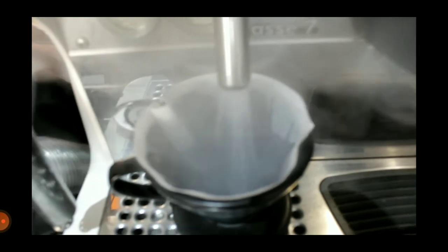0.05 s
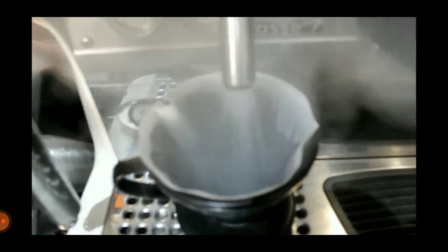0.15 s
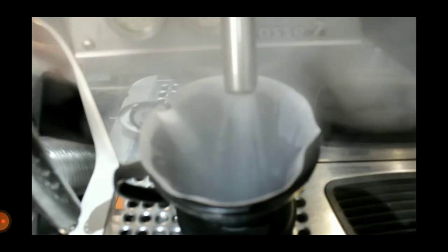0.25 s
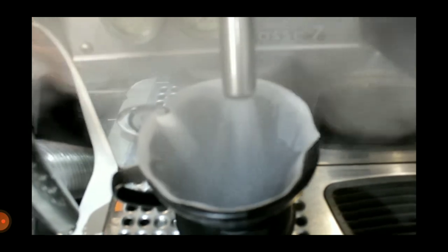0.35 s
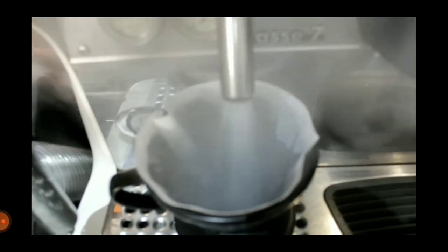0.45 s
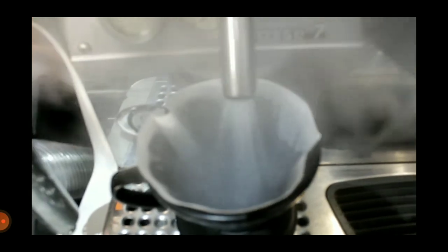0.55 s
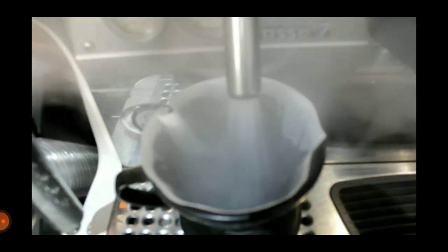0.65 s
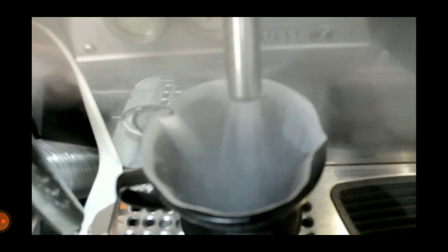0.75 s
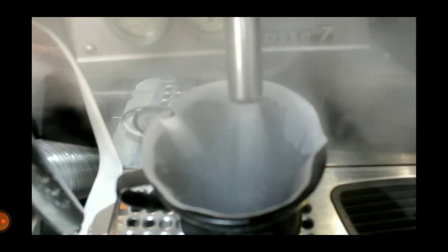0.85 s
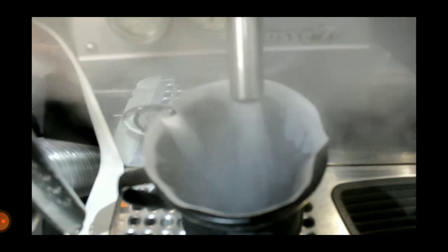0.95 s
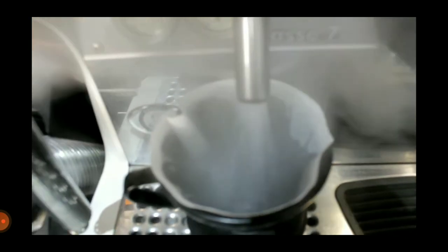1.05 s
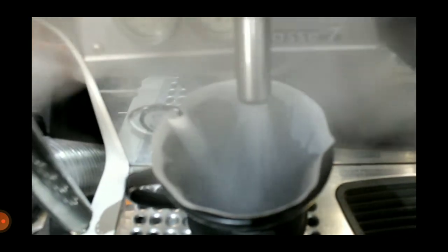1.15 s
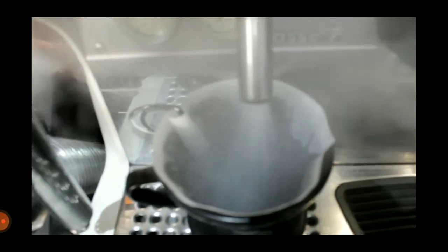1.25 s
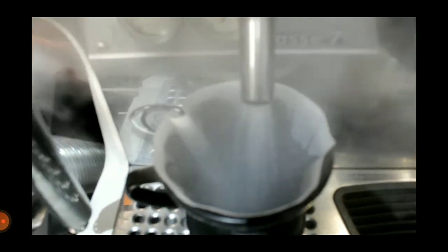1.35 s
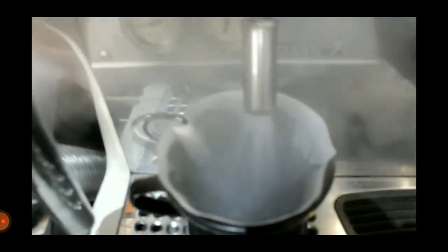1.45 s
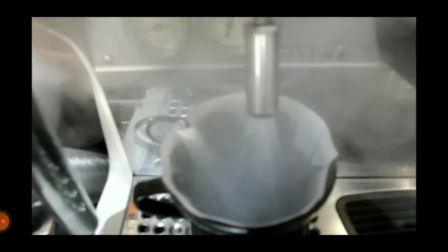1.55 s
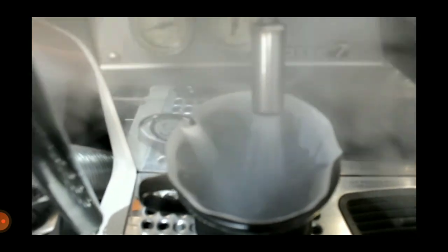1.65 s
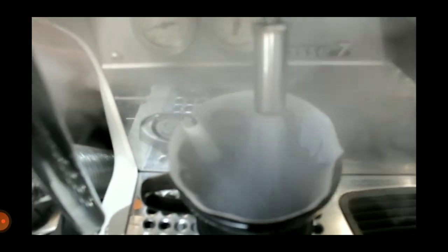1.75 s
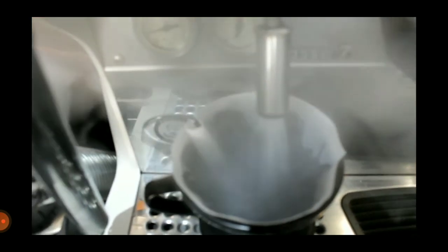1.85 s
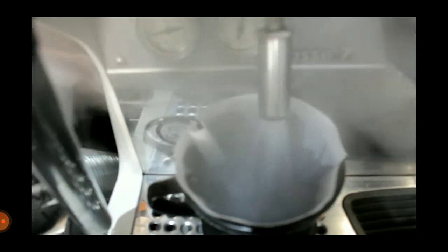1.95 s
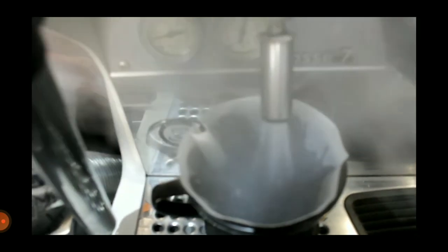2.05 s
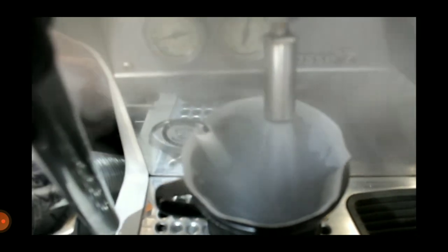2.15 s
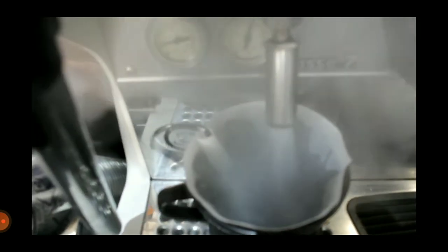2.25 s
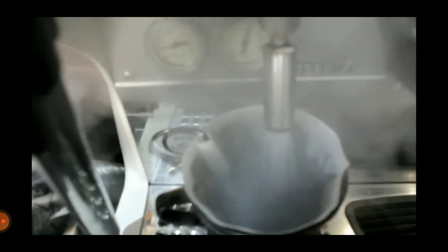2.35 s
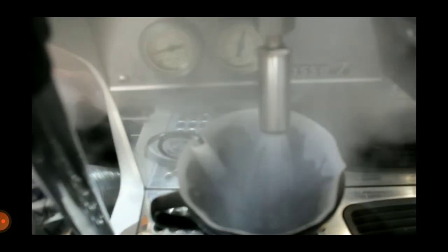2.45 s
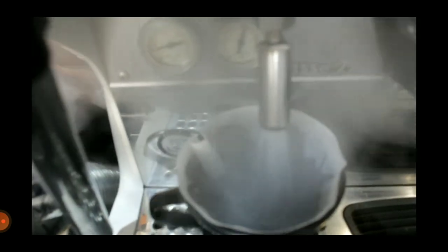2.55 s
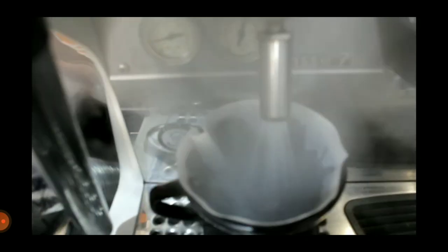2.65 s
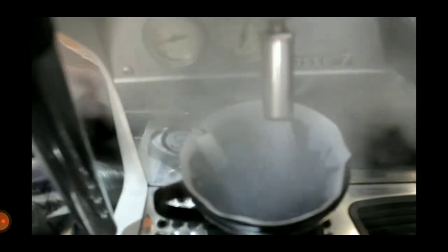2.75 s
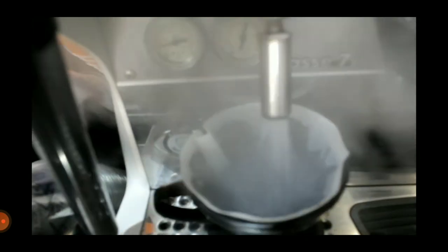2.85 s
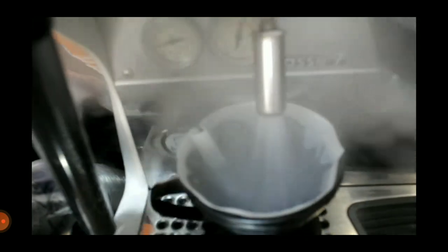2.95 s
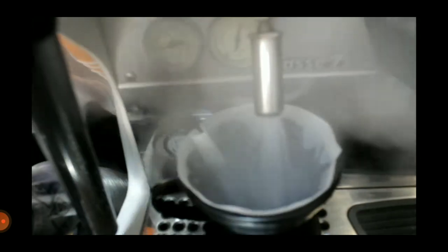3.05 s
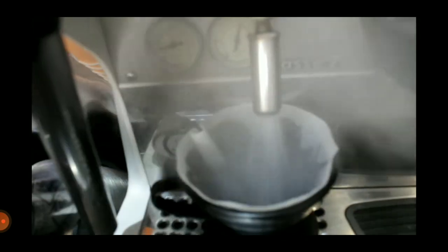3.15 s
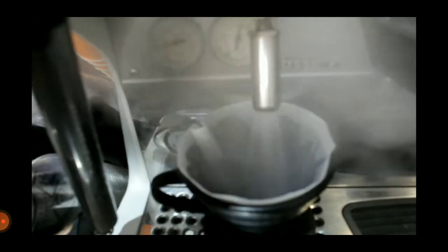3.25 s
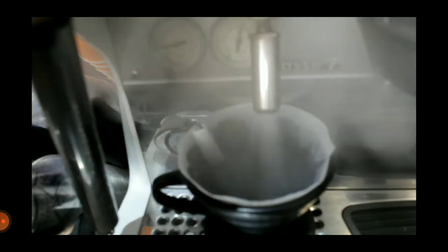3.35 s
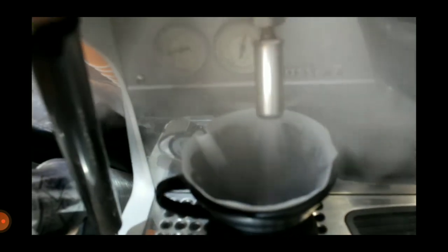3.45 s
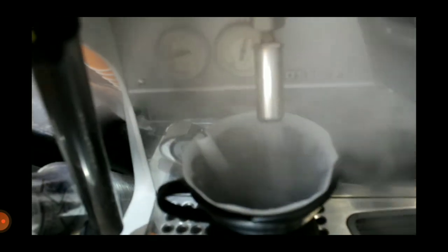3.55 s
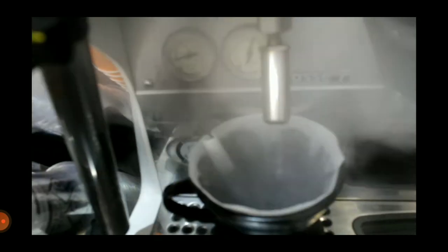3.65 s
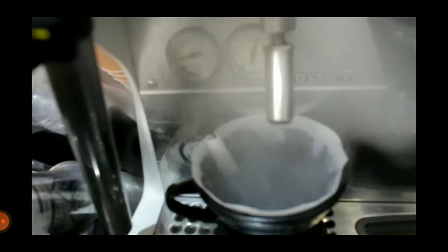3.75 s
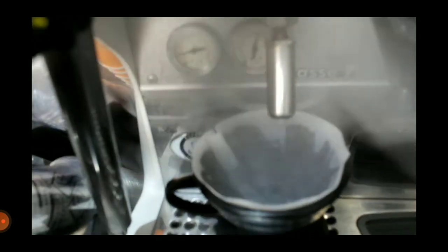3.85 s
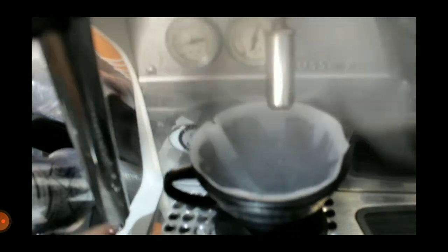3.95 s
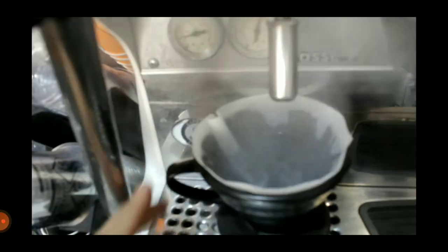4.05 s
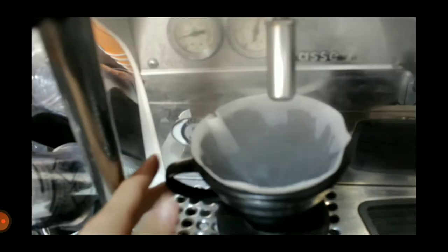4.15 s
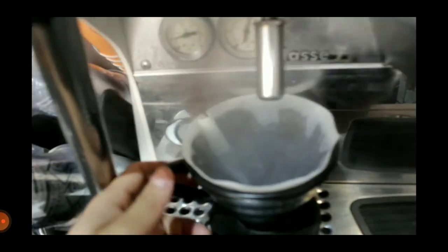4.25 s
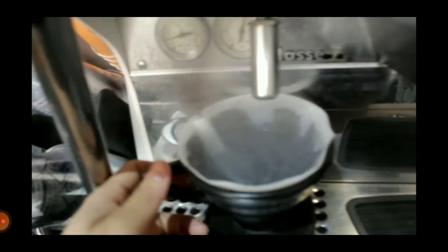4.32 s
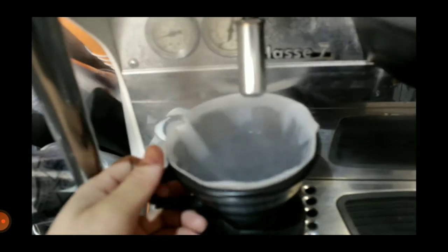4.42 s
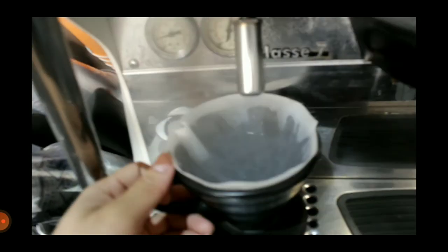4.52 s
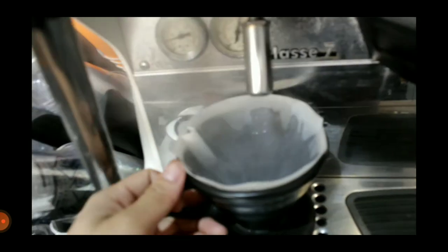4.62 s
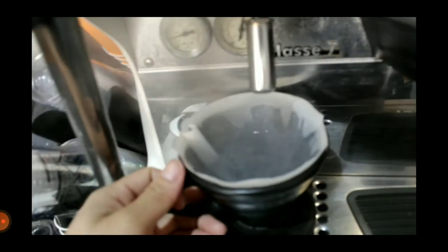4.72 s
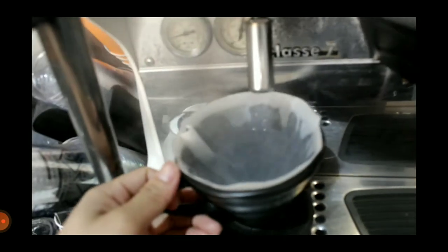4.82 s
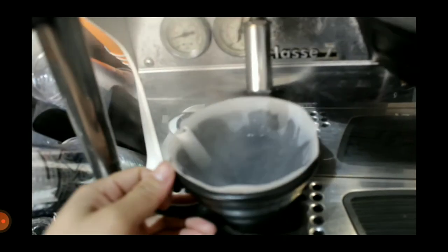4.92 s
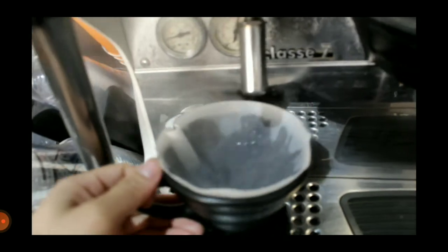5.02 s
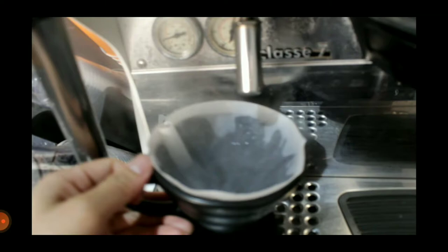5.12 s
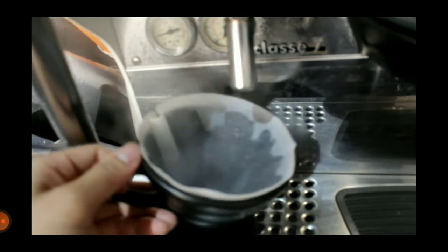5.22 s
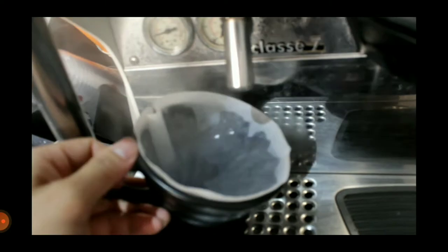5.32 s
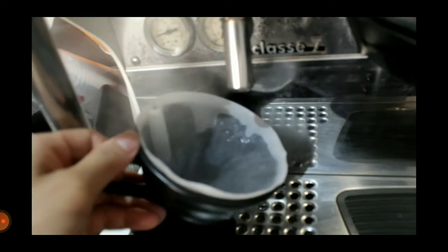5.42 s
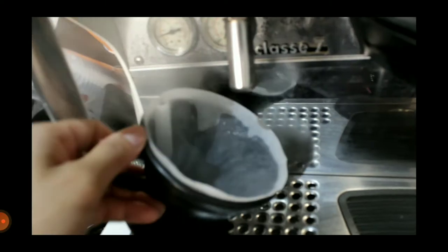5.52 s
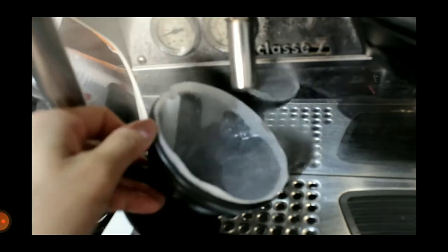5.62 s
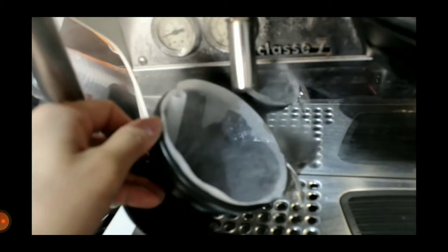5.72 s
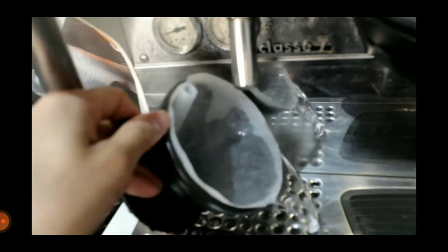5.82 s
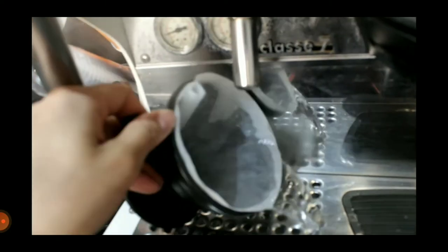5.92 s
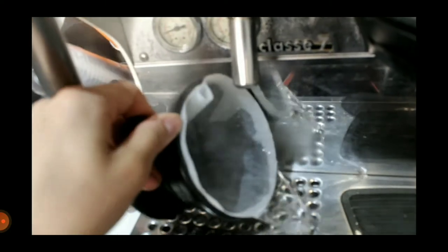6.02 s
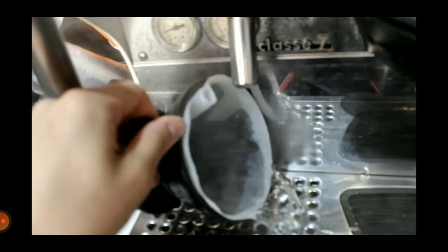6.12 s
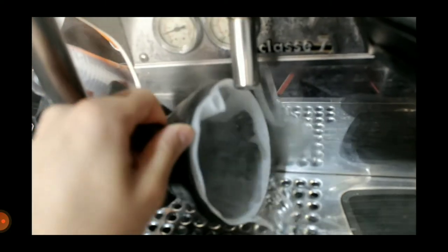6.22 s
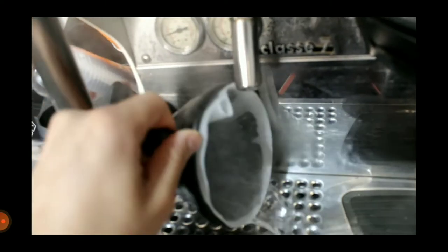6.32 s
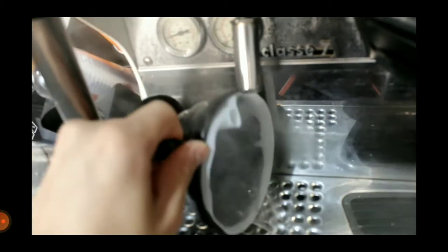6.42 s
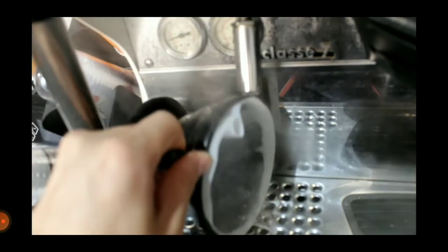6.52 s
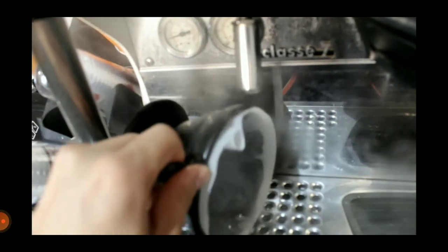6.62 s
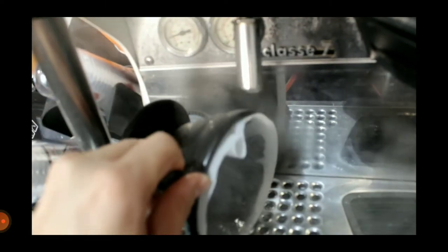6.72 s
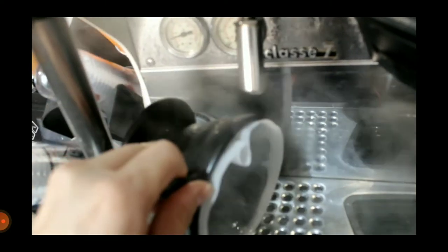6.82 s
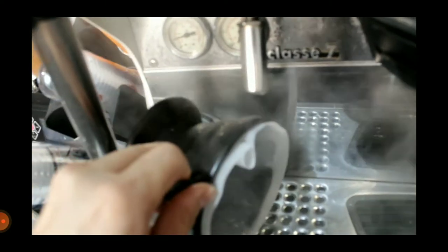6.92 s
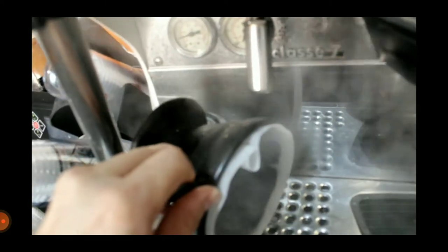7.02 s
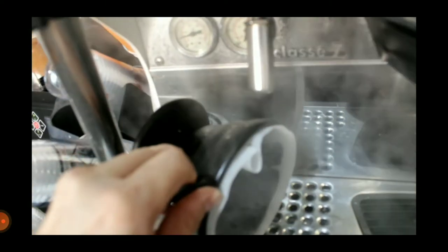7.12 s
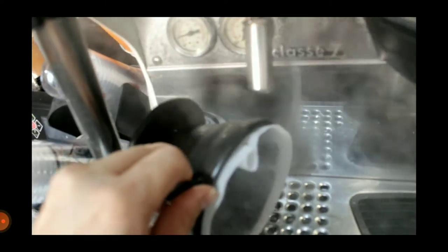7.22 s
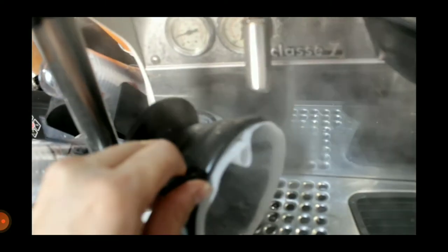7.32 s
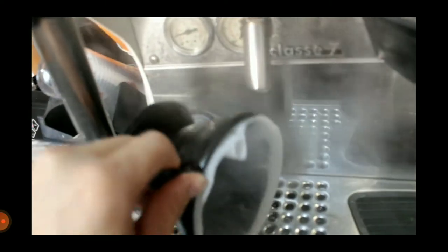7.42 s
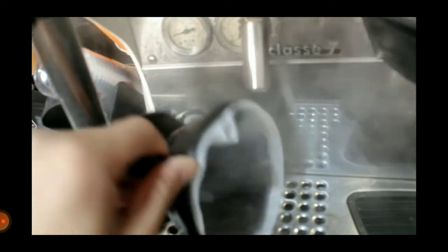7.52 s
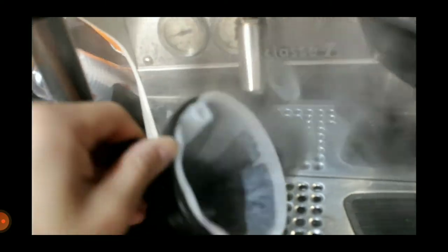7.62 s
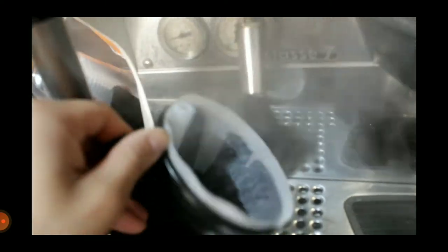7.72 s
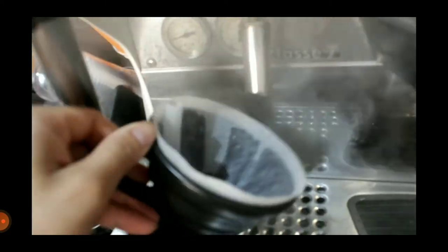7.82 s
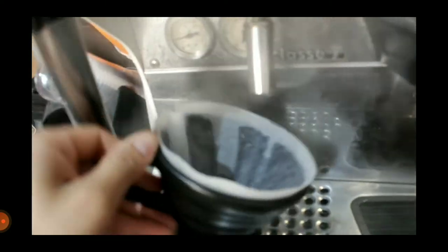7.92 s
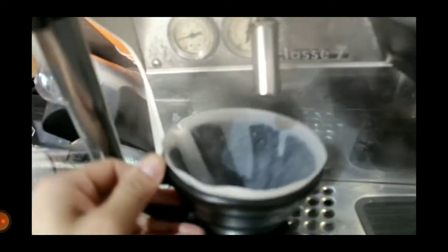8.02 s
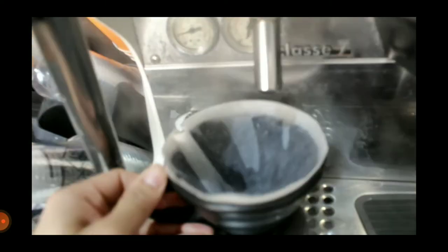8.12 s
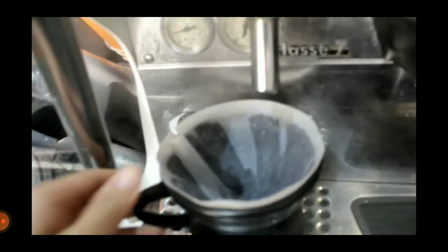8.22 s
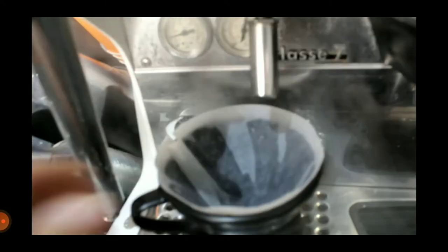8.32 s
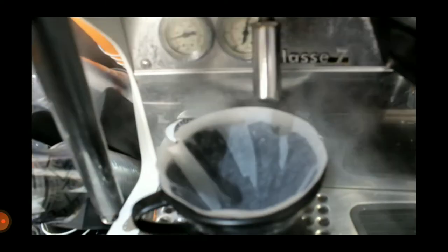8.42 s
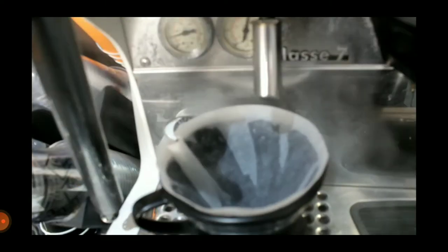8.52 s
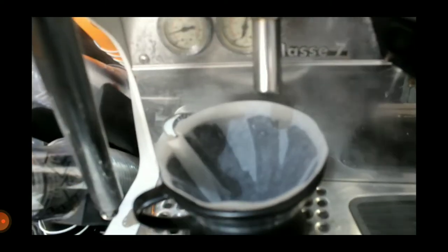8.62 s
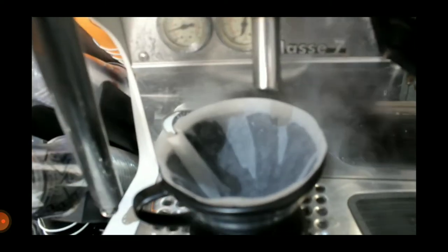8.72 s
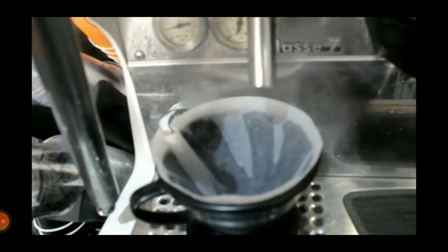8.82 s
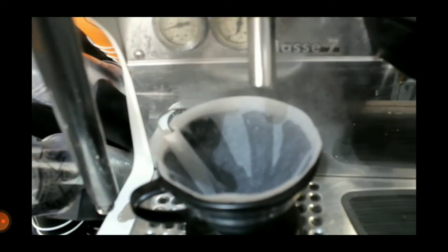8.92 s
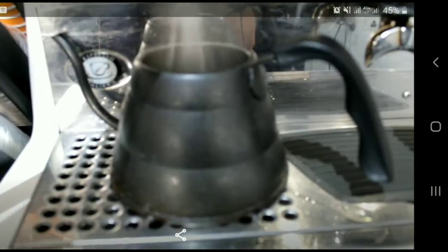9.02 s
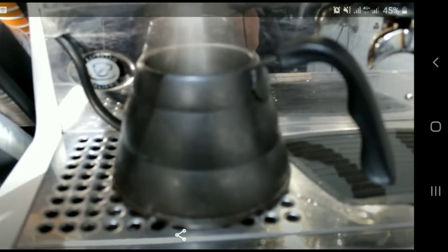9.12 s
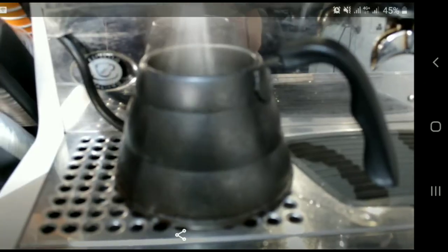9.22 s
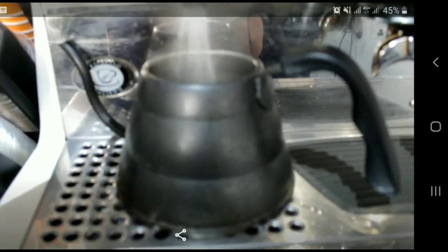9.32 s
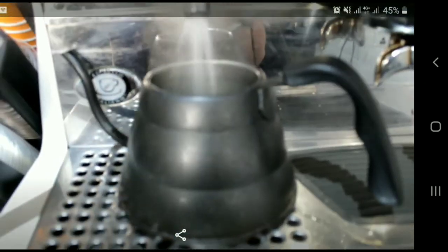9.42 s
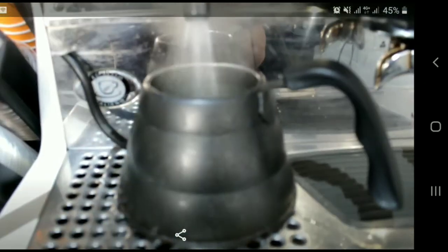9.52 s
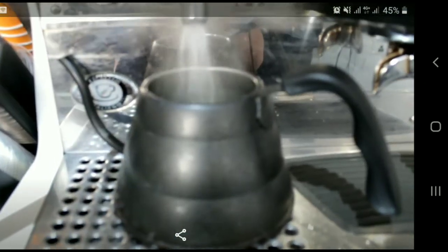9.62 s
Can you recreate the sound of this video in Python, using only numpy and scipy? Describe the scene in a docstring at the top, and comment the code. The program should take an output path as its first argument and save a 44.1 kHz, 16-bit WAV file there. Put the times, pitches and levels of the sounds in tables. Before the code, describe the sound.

A harsh, bright hiss of hot water from a coffee machine spout fills the first 3.7 seconds, very close to a small microphone that colours it and softly overloads. A faint whistling edge fades early as the jet thickens; low pops bump the microphone around 2.1-2.6. From about 3 the hiss grows thin and steamy, drops sharply near 3.8 and dies by 4.4, leaving a wash of cafe and machine with faint steady tones. Light rubbing and a hollow bump come at 4.5, then rougher drags and knocks at 5.0-5.4. Water splats on the steel tray at 5.5-5.9, trailing into drips until about 7.5, with a short singing rub at 6.9. Knocks at 7.5, a bright ringing clink at 7.8, and a hard, sharp set-down at 8.2 with rattling to 8.4. After a tiny silence at 9.1, a loud jet bursts into a kettle, slowly easing.

```python
"""Over a steady wash of cafe and machine, hot water hisses from a coffee machine spout into a paper filter
in a dripper: shaped noise that thins to a steamy spray and stops; low pops strike the microphone meanwhile.
A hand drags and tips the dripper (rough noise), water splats on the steel tray (short noise bursts) and the
dripper clinks down (noise bursts and decaying modes). After a brief silence the spout fills a kettle.
A small microphone close by colours everything and overloads softly."""
import sys
import numpy as np
from scipy import signal
from scipy.io import wavfile
from scipy.ndimage import uniform_filter1d, minimum_filter1d

SR = 44100
rng = np.random.default_rng(int(sys.argv[2]) if len(sys.argv) > 2 else 0)


def store_pcm(level_fs):
    """Save levels as 16-bit WAV."""
    pcm = np.round(np.clip(level_fs, -1, 1) * 32767).astype(np.int16)
    wavfile.write(sys.argv[1], SR, np.atleast_2d(pcm).T)


N = 426006
CUT_START_S, CUT_END_S = 9.102, 9.1095  # silence between the dripper scene and the kettle scene
FRAME, HOP = 1024, 256  # samples
HZ = np.fft.rfftfreq(FRAME, 1 / SR)
FRAME_S = np.arange(N // HOP + 5) * HOP / SR
# Levels are given ahead of the microphone; spectral densities are relative, t60 is the time to fall 60 dB.


def amp(db):
    """Logarithmic level: 20 dB is a tenfold pressure ratio."""
    return 10 ** (np.asarray(db) / 20)


def evened(x):
    """RMS normalisation: scales the mean square to one."""
    return x / np.sqrt(np.mean(x ** 2) + 1e-20)


def bells(rows, hz):
    """Resonance: each peak or dip is a Lorentzian bell in dB of given half-height width."""
    return sum(db / (1 + (2 * (hz - f) / width) ** 2) for f, width, db in rows)


def colour(points, rings, hz):
    """Spectral density with resonances, in dB, at unit power after the microphone response."""
    f, db = np.transpose(points)
    db = np.interp(np.log(hz + 1), np.log(f), db) + bells(rings, hz)
    heard_power = np.mean(amp(db + bells(MICROPHONE, hz)) ** 2)
    return db - 10 * np.log10(heard_power)


def curve(rows, t, order=1):
    """Linear interpolation of one table column over time."""
    rows = np.array(rows)
    return np.interp(t, rows[:, 0], rows[:, order])


def level(rows, order=1):
    """Amplitude envelope of a level column, faded to silence outside the table."""
    t = np.arange(N) / SR
    edge = np.clip(np.minimum(t - rows[0][0], rows[-1][0] - t) / .002, 0, 1)
    return amp(curve(rows, t, order)) * edge


def noise(db, patchy_db, flicker_db):
    """Short-time synthesis: random spectra with drifting patches and a flicker shared over wide bands."""
    real, imag, patches, flicker = rng.standard_normal((len(FRAME_S), len(HZ), 4)).T
    patches = uniform_filter1d(patches, size=8, axis=0)  # over frequency
    patches = evened(uniform_filter1d(patches, size=14, axis=1))  # over time
    flicker = evened(uniform_filter1d(flicker, size=120, axis=0))
    field = amp(patchy_db * patches + flicker_db * flicker)
    white = real + 1j * imag
    shaped = white / np.sqrt(np.mean(field ** 2)) * field * amp(db.reshape(len(HZ), -1))
    overlap = FRAME - HOP
    unit = signal.istft(white, nperseg=FRAME, noverlap=overlap)[1].std()
    return signal.istft(shaped, nperseg=FRAME, noverlap=overlap)[1][:N] / unit


def burst(s, length, t60):
    """Impulsive excitation: an envelope that jumps up, holds and decays exponentially."""
    t = np.arange(N) / SR - s
    return np.clip(t / 0.00044, 0, 1) * amp(-60 * np.maximum(t - length, 0) / t60)


# steady wash of the cafe and the machine: t/s, level/dB
WASH = [(0, -33.5), (3.4, -35), (3.75, -32.5), (3.85, -37.5), (4.76, -29), (5.0, -29.5), (5.15, -24.5),
        (6.0, -28), (6.4, -26.5), (7.45, -23.5), (7.9, -32), (8.16, -33.5), (8.29, -28.5), (8.59, -34.5),
        (9.1, -32.5)]
# its spectral density when quiet and when loud: f/Hz, density/dB per Hz
WASH_QUIET = [(40.0, -54), (150.0, -17), (300.0, -7), (700.0, 1), (1700.0, -14), (2600.0, 4.5),
              (3800.0, -8.5), (5300.0, -5.5), (7000.0, -9.5), (8700.0, -16.5), (10500.0, -27),
              (12500.0, -32), (15400.0, -64)]
WASH_LOUD = [(40.0, -37), (150.0, -24.5), (300.0, -8), (700.0, -6), (1700.0, -17.5), (2600.0, -2),
             (3800.0, -13), (5300.0, -10.5), (7000.0, -15.5), (8700.0, -19.5), (10500.0, -31.7),
             (12500.0, -36), (15400.0, -68.8)]
# machines humming in the wash, then dips in it: f/Hz, width/Hz, level/dB
HUMS = [(256, 28, 5), (338, 6.2, 8), (473, 21, 1.5), (680, 33, 2.5)]
HOLLOWS = [(4450, 610, -8), (7200, 300, -7), (1060, 110, -1.5), (11250, 150, -4)]
# thin steady machine tones: f/Hz, peak level/dB
TONES = [(360, -52), (490, -55), (2642, -48), (4682, -39)]


def wash():
    """Broadband noise whose spectrum follows its level, plus tones whose phase makes a small random walk."""
    loud = np.clip((curve(WASH, FRAME_S) + 36) / 9, 0, 1)  # 0 at -36 dB, 1 at -27 dB
    resonances = HUMS + HOLLOWS
    db = np.outer(colour(WASH_QUIET, resonances, HZ), 1 - loud)
    db += np.outer(colour(WASH_LOUD, resonances, HZ), loud)
    t = np.arange(N) / SR
    hiss = noise(db, patchy_db=.6, flicker_db=.8) * amp(curve(WASH, t))
    drift = np.cumsum(rng.standard_normal((len(TONES), N)), axis=1) * .01  # rad
    tones = sum(amp(db) * np.sin(2 * np.pi * hz * t + d) for (hz, db), d in zip(TONES, drift))
    return hiss + tones * (t < CUT_START_S)


# low pops at the microphone: t/s, level/dB before decay
POPS = [(2.082, -23), (2.231, -28.5), (2.254, -28), (2.276, -17.5), (2.306, -16.5), (2.448, -15),
        (2.579, -20)]


def pops():
    """Pressure transient: a quick dent and a swing back, slowing and decaying."""
    out = np.zeros(N)
    for s, db in POPS:
        cycles = np.arange(SR // 30) / SR * 170  # the first full swing lasts 1/170 s
        at = round(s * SR)
        out[at:at + len(cycles)] -= amp(db) * np.sin(2 * np.pi * cycles ** 0.49) * np.exp(-1.6 * cycles)
    return out


# small drops on the tray: t/s, rate/per s
DRIPPING = [(5.4, 1), (5.9, 10), (6.6, 14), (7.2, 6), (7.6, 0)]
DRIP_DB, DRIP_SPREAD_DB, DRIP_T60_S = -38, 3, 0.057


def drips():
    """Poisson process: the envelope of random small drops, each decaying exponentially."""
    t = np.arange(N) / SR
    landed = rng.random(N) < curve(DRIPPING, t) / SR
    drops = landed * amp(DRIP_DB + DRIP_SPREAD_DB * rng.standard_normal(N))
    return signal.lfilter([1], [1, -amp(-60 / (DRIP_T60_S * SR))], drops)


# water splatting on the tray, with two sharp ticks near 3.5-3.6 s and a short scrape at 8.83 s: t/s, level
# above 4 kHz/dB, level below 4 kHz/dB, length/s
SPLATS_AND_TICKS = [(3.544, -38, -20.5, 0.0068), (3.604, -32, -20, .005), (4.357, -28, -43, .0005),
                    (4.888, -38, -47, 0.0018), (5.526, -17, -17, 0.0093), (5.617, -22, -31, 0.0032),
                    (5.667, -11, -13, 0.0056), (5.76, -17.5, -25.5, 0.0086), (5.822, -31, -45, .006),
                    (5.858, -18, -23, 0.0052), (5.999, -29, -45, .004), (6.099, -25.5, -38, .007),
                    (6.113, -43, -24.5, 0.0082), (6.154, -26, -24.5, .005), (6.227, -25, -36, .005),
                    (6.253, -27, -36, 0.011), (6.296, -27, -29, 0.0094), (6.375, -29, -30, .007),
                    (6.405, -26, -45, .004), (6.428, -31, -28, .004), (6.5, -31, -45, .004), (6.54, -28, -40, .003),
                    (6.742, -22, -30, 0.007), (7.215, -31, -45, .003), (7.387, -17, -37, .001),
                    (8.019, -36, -49, .003), (8.834, -24.5, -33, 0.019), (9.086, -27, -37, .012)]
# airy top of a splat: f/Hz, density/dB per Hz
SPRAY = [(4000, -20), (6500, -8), (8500, 3.5), (10500, -12), (13000, -15), (14500, -28), (15400, -45)]
SPLAT_T60_S, SPRAY_DB = 0.049, -11  # spray level relative to the high part


def splats_and_ticks():
    """Short impacts: envelopes of the high and low parts of splats, ticks and a brief scrape, and a spray noise
    that follows the high part."""
    high, low = drips(), np.zeros(N)
    for s, high_db, low_db, length in SPLATS_AND_TICKS:
        shape = burst(s, length, SPLAT_T60_S)
        high += amp(high_db) * shape
        low += amp(low_db) * shape
    spray = amp(SPRAY_DB) * high * noise(colour(SPRAY, [], HZ), patchy_db=1.4, flicker_db=1.5)
    return high, low, spray


# hollow bumps: t/s, level/dB, f/Hz, t60/s
THUDS = [(4.585, -23, 702, 0.29), (4.63, -30, 428, .2), (5.108, -20, 581, 0.12), (5.672, -18, 690, 0.068),
         (7.559, -27, 202, 0.1), (7.631, -17, 480, 0.099)]


def thuds():
    """Modal decay: each bump is one dying low mode."""
    out, t = np.zeros(N), np.arange(SR // 5) / SR
    for s, db, hz, t60 in THUDS:
        at = round(s * SR)
        onset = np.clip(t / 0.0033, 0, 1)
        out[at:at + len(t)] += amp(db - 60 * t / t60) * np.sin(2 * np.pi * hz * t) * onset
    return out


def stroke(s, rise, hold, t60):
    """Sustained friction: an envelope that swells from 22 dB below its hold, holds and decays."""
    t = np.arange(N) / SR - s
    swell_db = -22 * np.clip(1 - t / rise, 0, 1)
    return (t > 0) * amp(swell_db - 60 * np.maximum(t - rise - hold, 0) / t60)


# the dripper dragged and rocked on the tray:
# t/s, rise/s, hold/s, t60/s, level above 4 kHz/dB, level below 4 kHz/dB, singing level/dB
DRAGS = [(4.466, 0.031, 0.13, 1, -30.5, -46, -54), (4.538, 0.04, 0.05, 0.37, -42.5, -23, -50),
         (5.029, 0.059, 0.046, 0.12, -15.5, -18, -26), (5.15, 0.031, 0.22, 0.069, -17, -23, -35),
         (5.276, .11, 0.02, .12, -24, -19, -29), (6.901, 0.013, 0.016, 0.38, -22, -26.5, -13),
         (7.533, .01, .03, 0.23, -51, -35, -46), (8.218, .004, 0.073, 0.26, -19.5, -24, -32),
         (8.325, 0.014, 0.023, 0.23, -25.5, -18, -40)]
# modes that sing under the rubbing: f/Hz, width/Hz, level/dB
SING = [(2310, 220, 13), (2840, 200, 10), (3370, 330, 17)]


def drags(rub_points):
    """Stick-slip friction: dense catches roughen the high and low envelopes; modes sing under the rubbing."""
    strokes = np.array([stroke(*row[:4]) for row in DRAGS])
    high, low, sing = amp(np.array(DRAGS)[:, 4:]).T @ strokes
    sing = sing * noise(colour(rub_points, SING, HZ), patchy_db=2.7, flicker_db=4.0)
    catches = (rng.random(N) < 250 / SR) * rng.uniform(.1, .9, N)  # 250 per second
    catches = uniform_filter1d(catches, size=40)
    decay = np.exp(-1 / (0.0029 * SR))  # each catch dies in a few ms
    rough = evened(0.92 + signal.lfilter([1], [1, -decay], catches))
    return rough * high, rough * low, sing


# the dripper knocking on steel: t/s, level above 4 kHz/dB, level below 4 kHz/dB, t60/s, ring level/dB
KNOCKS = [(5.099, -14, -16, 0.04, -40), (5.11, -23, -16, 0.044, -40), (5.132, -25, -27, .054, -40),
          (5.332, -16, -32, .05, -37), (6.912, -33, -34, 0.074, -50), (7.5284, -23, -9.5, .1, -27),
          (7.538, -36, -15, .2, -17.5), (7.547, -38, -23, 0.13, -21), (7.558, -43, -21, .25, -25),
          (7.623, -38, -26.5, 0.17, -26), (7.773, -12, -19.5, 0.062, -1), (7.785, -14, -20, 0.072, 1),
          (7.794, -22, -24, 0.033, -3), (7.804, -24, -20, 0.25, -5.5), (8.165, -1.5, -8, 0.059, -24),
          (8.179, -30, -9.5, 0.1, -40), (8.222, -13, -11.5, 0.052, -27), (8.242, -22, -18.5, 0.065, -34),
          (8.324, -23, -29, .05, -30), (8.337, -11, -21, 0.031, -15), (8.357, -19, -21, 0.035, -27)]
# modes of the dripper: f/Hz, level relative to the ring/dB, t60/s at a knock t60 of HELD_T60_S
CLINK = [(2480, -14, .17), (3548, -19, .12), (5001, -20, .2), (5826, -14, .2), (5975, 0, .22),
         (6000, -8, .4), (6912, -4, .3), (7957, -7, .13), (7985, -19, .4), (9265, -23, .15),
         (11830, -9, .1), (12060, -11, .1)]
# body of a knock: f/Hz, density/dB per Hz; then its resonances: f/Hz, width/Hz, level/dB
CLUNK = [(200, -43), (600, -16), (1200, -3.5), (1700, -21.5), (2600, 8.5), (3200, -7.5), (4200, -35),
         (8000, -54)]
CLUNK_RINGS = [(1380, 80, 5.5), (1930, 80, 12), (2100, 95, 0.5), (2400, 88, 0.5), (2970, 46, 5)]
HELD_T60_S = .31  # a knock this long lets the modes ring their full time; a shorter one damps them
TICK_GAIN, TICK_T60_S = 1.4, .012  # sharp tick leading each knock, relative to its body
CRACK_DB, CRACK_HZ = 16, 3200  # first contact of a knock, above the level of its body


def knocks():
    """Impact and modal ringing: the high envelope, and the sum of noisy body, contact crack and modes."""
    high, clunk = np.zeros(N), np.zeros(N)
    clack, ring = np.zeros(N + SR), np.zeros(N + SR)
    t = np.arange(SR // 2) / SR
    u = (np.pi * (CRACK_HZ * t - 1)) ** 2
    crack = (1 - 2 * u) * np.exp(-u)  # one sharp swing with no push left over
    turns = rng.random((len(KNOCKS), len(CLINK)))  # starting phases in cycles
    for (s, high_db, low_db, t60, ring_db), turn in zip(KNOCKS, turns):
        blow = burst(s, 0, t60) + TICK_GAIN * burst(s, 0, TICK_T60_S)
        high += amp(high_db) * blow
        clunk += amp(low_db) * blow
        at = round(s * SR)
        clack[at:at + len(t)] += amp(low_db + CRACK_DB) * crack
        modes = np.zeros(len(t))
        for (hz, db, full_t60), phase in zip(CLINK, turn):
            mode_t60 = full_t60 * t60 / HELD_T60_S
            modes += amp(ring_db + db - 60 * t / mode_t60) * np.sin(2 * np.pi * (hz * t + phase))
        ring[at:at + len(t)] = modes  # a new contact stops the ringing of the last one
    body = noise(colour(CLUNK, CLUNK_RINGS, HZ), patchy_db=1.5, flicker_db=1.5)
    return high, clunk * body + (ring + clack)[:N]


# rough noise shared by drags, splats and knocks: f/Hz, density/dB per Hz
RUB = [(40.0, -55), (150.0, -45), (300.0, -16), (700.0, -15.5), (1700.0, -19.5), (2600.0, -4),
       (3800.0, -11.5), (5300.0, -0.5), (7000.0, -1), (8700.0, -4.5), (10500.0, -20.5), (12500.0, -17),
       (15400.0, -64)]
# its resonances: f/Hz, width/Hz, level/dB
RUB_RINGS = [(1650, 100, -15.5), (2300, 67, 3), (2900, 130, 1.5), (3570, 136, 2.5), (5610, 115, 2),
             (7900, 240, -5.5)]
NO_BASS_HZ = 300  # the dripper is too small to radiate below this


def dripper():
    """Source-filter principle: drags, splats and knocks shape one rough noise in a high and a low part."""
    rub = colour(RUB, RUB_RINGS, HZ)
    heard = amp(rub + bells(MICROPHONE, HZ)) ** 2
    above = 1 / (1 + (4000 / (HZ + 1)) ** 12)  # share of power above 4 kHz
    parts = []
    for share in (above, 1 - above):
        part_db = rub + 10 * np.log10(share / np.mean(share * heard) + 1e-9)
        parts.append(noise(part_db, patchy_db=2.5, flicker_db=2.5))
    drag_high, drag_low, sing = drags(RUB)
    splat_high, splat_low, spray = splats_and_ticks()
    knock_high, knock_body = knocks()
    high = drag_high + splat_high + knock_high
    low = drag_low + splat_low
    rattle = high * parts[0] + low * parts[1] + spray + sing + knock_body
    return signal.lfilter(*signal.butter(2, NO_BASS_HZ, "high", fs=SR), rattle) + thuds()


# spout over the dripper: t/s, level/dB, share of the thin steamy spray (0-1), fizz f/Hz
SPOUT = [(0, -9.5, 0.37, 8000), (.8, -6, 0.15, 7770), (1.5, -4, 0.05, 8200), (2.6, -5.5, 0.1, 9270),
         (3.1, -9, 0.38, 8380), (3.35, -9.5, 0.75, 7700), (3.72, -7.5, 0.7, 8170), (3.78, -22.5, .7, 8100),
         (3.97, -35, 0.85, 9400), (4.2, -34, .6, 9200), (4.45, -46, 0.7, 8000)]
# full jet, thin spray and jet in the kettle: f/Hz, density/dB per Hz;
# each followed by the resonances of its vessel: f/Hz, width/Hz, level/dB
FULL = [(40.0, -39), (150.0, -62), (300.0, -59), (700.0, -22), (1700.0, -23.5), (2600.0, -13), (3800.0, -6),
        (5300.0, 5), (7000.0, -9), (8700.0, 2.5), (10500.0, -25.5), (12500.0, -14.5), (15400.0, -56)]
FULL_RINGS = [(2975, 290, 8.5), (4150, 120, 11.5), (5330, 160, -3.5), (5550, 350, 3), (7270, 520, 4),
              (8090, 110, 6), (11900, 530, 9.5)]
THIN = [(40, -46), (150, -55), (300, -62), (700, -19), (1700, -24.5), (2600, -10.5), (3800, 2.5),
        (5300, 2.5), (7000, -11), (8700, -9.5), (10500, -14), (12500, -21.5), (15400, -33)]
THIN_RINGS = [(3380, 310, 3.5), (3500, 100, 3), (3820, 250, -19), (4780, 310, 4.5), (5210, 99, 5),
              (7440, 460, 19), (5770, 400, -3), (9500, 270, 11), (12900, 400, 6)]
INTO_KETTLE = [(40.0, -38), (150.0, -54), (300.0, -33.5), (700.0, -39), (1700.0, -23), (2600.0, -5),
               (3800.0, -16.5), (5300.0, -4.5), (7000.0, -5.5), (8700.0, -9.5), (10500.0, -16),
               (12500.0, -21), (15400.0, -42)]
KETTLE_RINGS = [(1740, 290, -19), (2640, 210, 10), (4170, 490, 11.5), (5450, 210, 8.5), (6100, 240, 7.5),
                (6900, 650, 13.5), (1115, 200, 20.5), (8200, 200, 7), (11650, 260, 8)]
FIZZ_FROM_HZ, FIZZ_DB_PER_KHZ = 7660, 6  # zero gain at this frequency; louder as the fizz climbs
WHISTLE_HZ, WHISTLE_WIDTH_HZ, WHISTLE_DB, WHISTLE_FADE_S = 5150, 170, 8, .5  # an edge in the hiss
KETTLE_DB, KETTLE_SAG_DB_PER_S = -5, -3.5
KETTLE_SPURT_DB, KETTLE_SPURT_T60_S = -2, .04  # extra push as it sets in


def spout():
    """Turbulent jet noise: a full jet that thins to spray as the pressure changes, then the kettle jet."""
    t = np.arange(N) / SR
    thin = np.clip(curve(SPOUT, FRAME_S, order=2), 0, 1)
    db = np.outer(colour(FULL, FULL_RINGS, HZ), 1 - thin)
    db += np.outer(colour(THIN, THIN_RINGS, HZ), thin)
    # the fizz is a broad resonance with an overtone that slides as the dripper fills
    fizz_hz = curve(SPOUT, FRAME_S, order=3)
    fizz_db = FIZZ_DB_PER_KHZ * (fizz_hz - FIZZ_FROM_HZ) / 1e3
    db += bells([(fizz_hz, 1500, fizz_db), (1.37 * fizz_hz, 1500, 0.31 * fizz_db)], HZ[:, None])
    whistle_db = WHISTLE_DB * np.exp(-FRAME_S / WHISTLE_FADE_S)  # fades as the jet fills
    db += bells([(WHISTLE_HZ, WHISTLE_WIDTH_HZ, whistle_db)], HZ[:, None])
    # the colour changes while the spout is silent
    db[:, FRAME_S > CUT_START_S - .5] = colour(INTO_KETTLE, KETTLE_RINGS, HZ)[:, None]
    kettle = amp(KETTLE_DB + KETTLE_SAG_DB_PER_S * (t - CUT_END_S)) * (t > CUT_START_S)
    spurt = amp(KETTLE_SPURT_DB) * burst(CUT_END_S, 0, KETTLE_SPURT_T60_S)
    return noise(db, patchy_db=0.9, flicker_db=1.47) * (level(SPOUT) + kettle + spurt)


def nook(x):
    """Reverberation: steel panels around the spout throw back a short tail of sparse echoes."""
    t = np.arange(SR // 4) / SR
    echoes = (rng.random(len(t)) < 2000 / SR) * rng.choice([-1., 1.], len(t))  # 2000 per second
    taps = echoes * amp(-60 * t / 0.21) * (t > .002)
    return x + amp(-10.5) * signal.oaconvolve(x, taps / np.linalg.norm(taps))[:N]


def scene():
    """Superposition: all sources add at one microphone, alike left and right; the pops have no echoes."""
    return np.tile(nook(wash() + dripper() + spout()) + pops(), (2, 1))


# peaks and dips of the microphone in its housing: f/Hz, width/Hz, level/dB
MICROPHONE = [(826, 25, -6.5), (1070, 291, -20.5), (1673, 520, 16.5), (2673, 394, -9.5), (4270, 480, -4),
              (4600, 300, -6.5), (5100, 760, 1), (5820, 500, 1.5), (6903, 825, -14.5), (7890, 150, 5.5),
              (9300, 370, 5), (9870, 1370, -13.5), (10740, 460, 7), (11330, 103, -13), (11360, 190, 9),
              (13600, 140.0, -9), (14160.0, 770.0, 7)]
BAND_EDGE_HZ = 15470


def record(dry):
    """Minimum-phase response, limiting, saturation, bass cut, the silence at the cut and the band limit."""
    hz = np.fft.rfftfreq(4096, 1 / SR)
    log_gain = np.log(amp(bells(MICROPHONE, hz)))
    circle = np.r_[log_gain, log_gain[-2:0:-1]]
    # causal: phase from the log gain
    taps = np.fft.ifft(np.exp(np.conj(signal.hilbert(circle)))).real[:2048]
    x = signal.oaconvolve(dry, taps[None], axes=1)[:, :N]
    # a fast limiter rides the peaks over 2 ms, and what passes it is rounded off
    peak = -minimum_filter1d(-abs(x), size=88, axis=1)
    x = x / uniform_filter1d(np.maximum(peak / 1.04, 1) ** 0.43, size=88, axis=1)
    x = 1.05 * np.tanh(x / 1.355)
    x = signal.lfilter(*signal.butter(1, 45, "high", fs=SR), x)
    t = np.arange(N) / SR
    x = x * np.clip(np.maximum(CUT_START_S - t, t - CUT_END_S) / .0005, 0, 1)
    band_limit = signal.firwin(1023, BAND_EDGE_HZ, window=("kaiser", 9), fs=SR)
    return signal.oaconvolve(x, band_limit[None], "same")


dry = scene()
out = record(dry)
store_pcm(out)
```